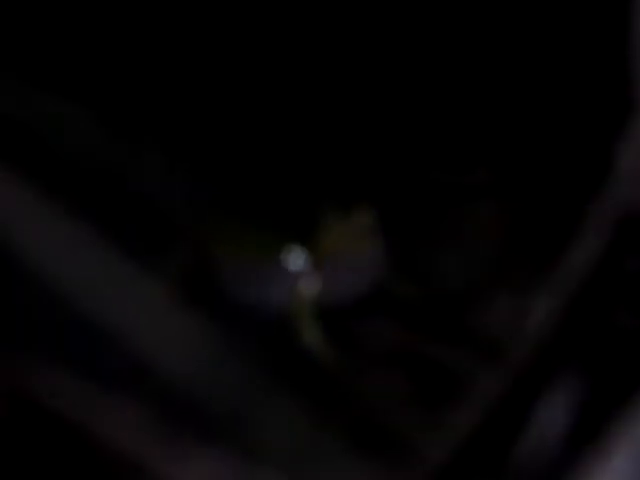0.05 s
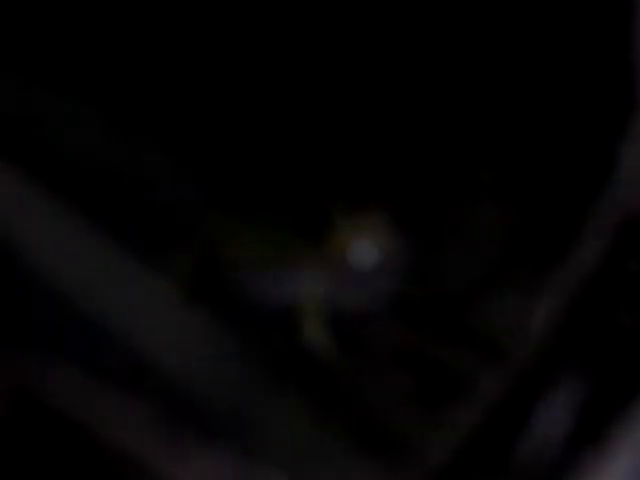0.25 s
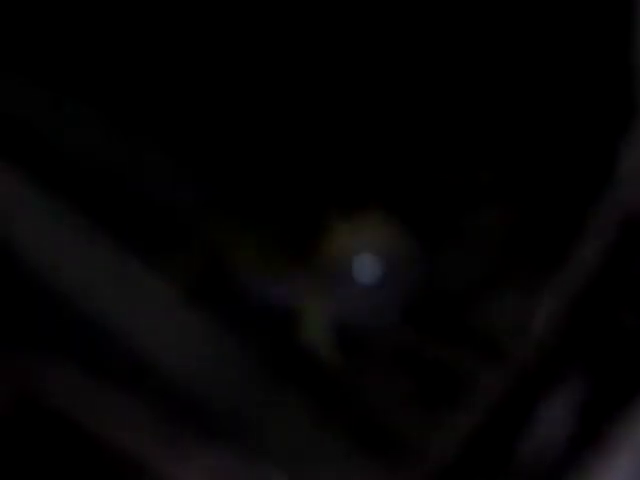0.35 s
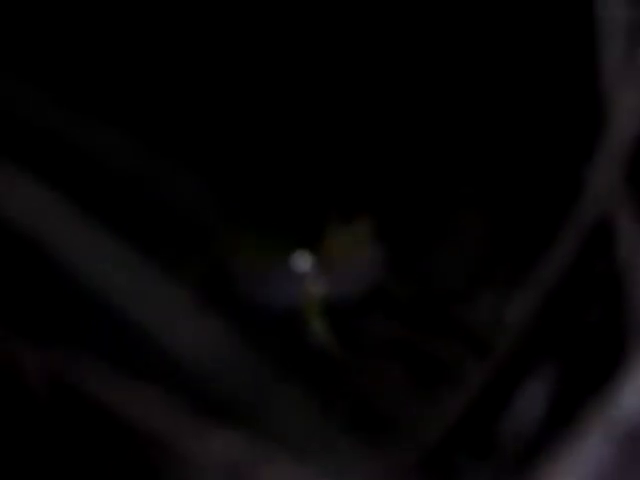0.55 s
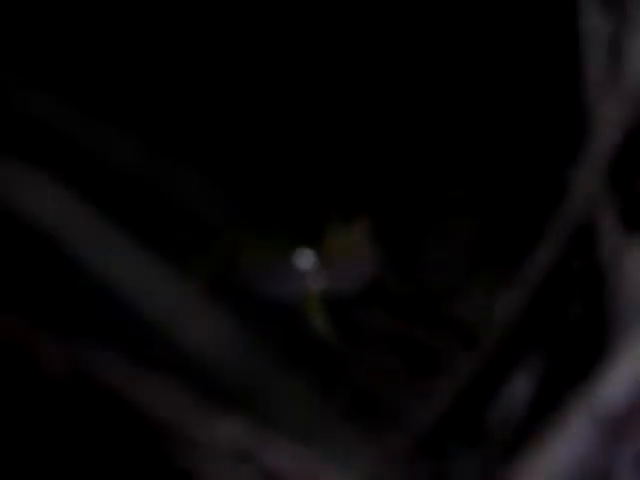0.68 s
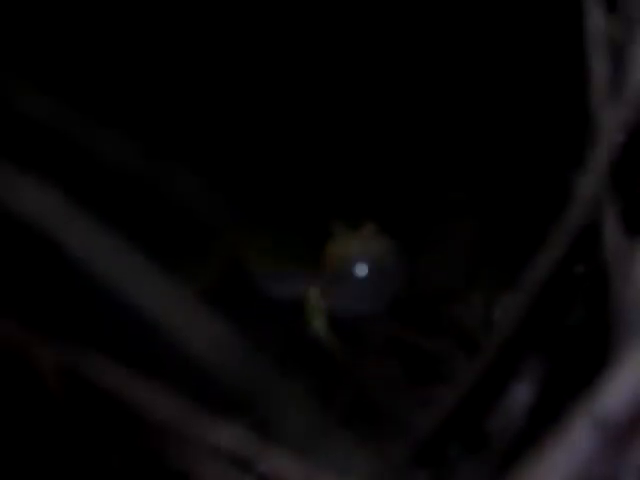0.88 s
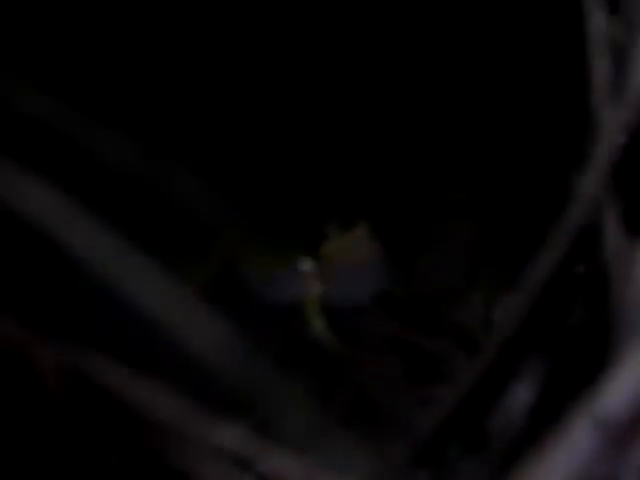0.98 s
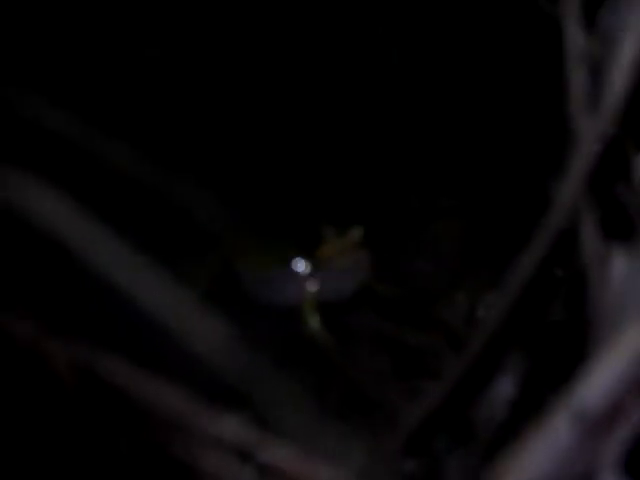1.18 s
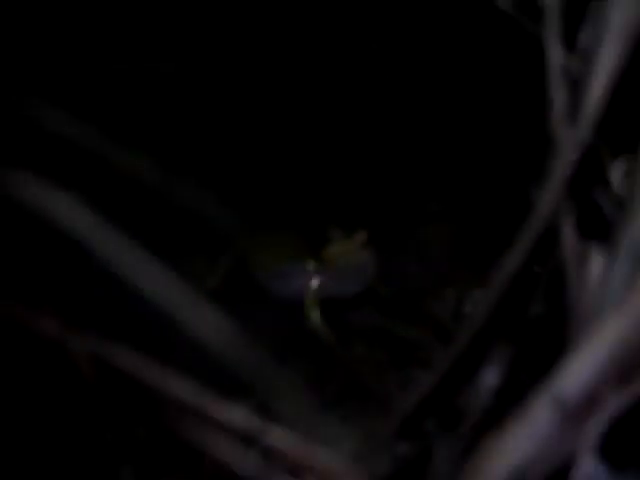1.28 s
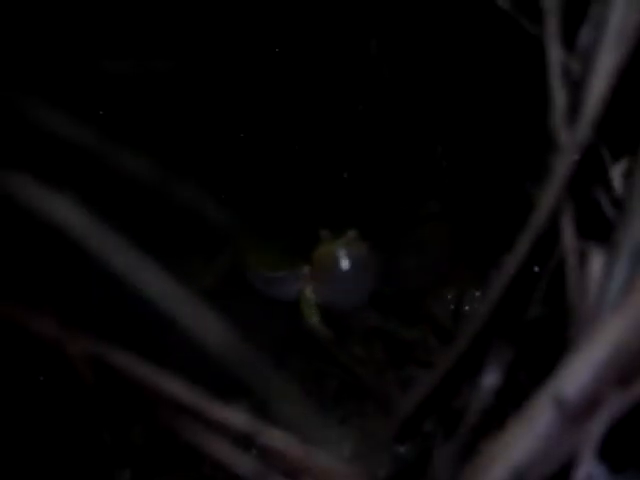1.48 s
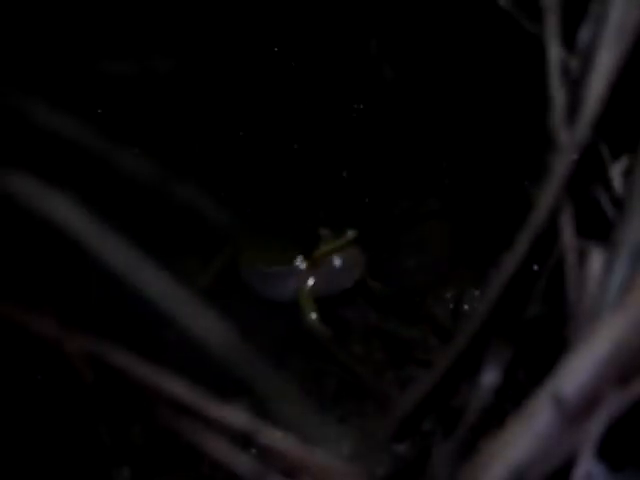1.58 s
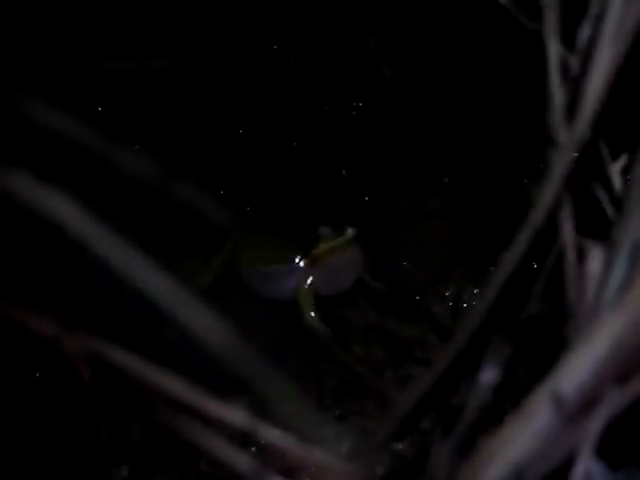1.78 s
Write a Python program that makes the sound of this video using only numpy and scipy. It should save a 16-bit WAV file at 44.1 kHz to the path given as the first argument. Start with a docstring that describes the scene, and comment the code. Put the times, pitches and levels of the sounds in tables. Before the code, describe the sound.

A small tree frog close by gives short harsh rasping croaks at night over faint crickets

```python
"""Night brush, with a tree frog croaking close by. Each croak is a train of about 120 pulses a second: the
larynx opens with a soft push and a rasp of air, then snaps shut and rings the vocal sac, whose pitch rises
as it fills; late in a croak every other snap fails. Behind it are far frogs (noise-smeared pulse trains over
a steady chorus band), three trilling cricket voices (short falling tones), soft taps in the brush (fading
noise bands) and faint night air (coloured noise)."""
import sys
import numpy as np
from scipy import signal
from scipy.fft import rfft, irfft
from scipy.io import wavfile
from scipy.ndimage import uniform_filter1d

SR = 44100
rng = np.random.default_rng(int(sys.argv[2]) if len(sys.argv) > 2 else 0)


def materialize(psi):
    """Save the field psi as 16-bit PCM at rate SR to the path in sys.argv[1].

    A 1-D psi becomes a single channel; in a 2-D psi each row is a channel.
    """
    bounded = np.clip(np.atleast_2d(psi).T, -1, 1)
    quanta = np.round(bounded * 32767).astype(np.int16)
    wavfile.write(sys.argv[1], SR, quanta)


N = 81585  # scene length, samples


def undb(db):
    """Turn dB into an amplitude factor."""
    return 10 ** (np.asarray(db) / 20)


def unit(x):
    """Scale to rms 1."""
    return x / np.sqrt(np.mean(x ** 2))


def colour(x, points):
    """Causal minimum-phase filter through (f/Hz, level/dB) points, joined on a log-frequency axis."""
    hz, db = np.array(points, float).T
    size = 2048
    f = np.maximum(np.fft.rfftfreq(size, 1 / SR), 1)
    gain = undb(np.interp(np.log(f), np.log(hz), db))
    # Folding the cepstrum onto positive time makes the filter minimum-phase
    cepstrum = irfft(np.log(gain))
    cepstrum[1:size // 2] *= 2
    cepstrum[size // 2 + 1:] = 0
    impulse = irfft(np.exp(rfft(cepstrum)))
    return signal.fftconvolve(x, impulse)[:len(x)]


def band(hz, width_hz):
    """Noise in one bell-shaped band, rms 1."""
    f = np.fft.rfftfreq(N, 1 / SR)
    bell = np.exp(-((f - hz) / width_hz) ** 2)
    return unit(irfft(rfft(rng.standard_normal(N)) * bell, N))


def walk(rate):
    """Smooth random drift, rms 1, with `rate` new values a second."""
    k = int(SR / rate)
    steps = np.repeat(rng.standard_normal(N // k + 1), k)
    return unit(uniform_filter1d(steps, k)[:N])


def add(out, at_s, sound):
    """Mix a short sound in at a time."""
    i = max(int(at_s * SR), 0)
    part = sound[:max(N - i, 0)]
    out[i:i + len(part)] += part


# Spectral tilt of the night air: f/Hz, relative level/dB
AIR_COLOUR = [(25, 14.5), (60, -5.5), (130, -4.5), (250, -5.5), (500, -5.5), (1000, -4.5), (2000, -3.5),
              (4600, -5), (5400, -9.5), (6900, -15), (7400, -9.5), (10000, -9)]
AIR_DB = -55.5


def night_air():
    """Faint broadband air: steady coloured noise."""
    return undb(AIR_DB) * unit(colour(rng.standard_normal(N), AIR_COLOUR))


# Far croaks: middle t/s, length t/s, level/dB
FAR_CALLS = [(0.097, 0.17, -54), (0.194, 0.047, -48.5), (.67, .19, -54.5), (1.033, 0.42, -57.5),
             (1.674, .2, -57.5)]
# Tone of the far croaks: f/Hz, relative level/dB
FAR_COLOUR = [(500, -37), (1050, -4), (1400, 2), (1800, -4), (2300, -4), (3100, 5.5), (3600, -10),
              (4500, -18.5), (9000, -32)]
# Tone of the chorus of still farther frogs: f/Hz, relative level/dB
CHORUS_COLOUR = [(2000, -36.5), (2400, -6.5), (2520, -1.5), (2730, 5.5), (2850, -11), (3080, 12), (3400, 4),
                 (3700, -2), (4200, -31.5)]
CHORUS_DB = -54.5
FAR_RATE_HZ, FAR_T60_S = 118, .12  # pulse rate; time for the trees' tail to fall 60 dB


def far_frogs(t):
    """Pulsed croaks smeared by the trees, over a steady chorus."""
    phase = np.cumsum(FAR_RATE_HZ * (1 + 0.034 * walk(30))) / SR
    pulses = np.diff(np.floor(phase), prepend=0)  # one click a cycle
    trees = rng.standard_normal(N) * undb(-60 * t / FAR_T60_S)
    voice = unit(colour(signal.fftconvolve(pulses, trees)[:N], FAR_COLOUR))
    swell = 0
    for middle, length, db in FAR_CALLS:
        swell = swell + undb(db) * np.exp(-(2 * (t - middle) / length) ** 4)
    chorus = unit(colour(rng.standard_normal(N), CHORUS_COLOUR))
    chorus_level = undb(CHORUS_DB + 0.88 * walk(6.65))
    return voice * swell + chorus_level * chorus


# Cricket voices: pitch f/Hz, fall in a pulse [share of pitch], pulse rate f/Hz, tone level/dB,
# level change by the end/dB, smear width f/Hz, smear level relative to the tone/dB
CRICKETS = [(3807, 0.067, 34, -48.5, -7.5, 215, -2), (6427, 0.016, 23, -55.5, -6.5, 660, -3.5),
            (6204, 0.018, 54, -66.5, 1.5, 440, 0)]
CRICKET_WAVER_DB, CRICKET_DRIFT = .7, .03  # rms level drift; rms pulse-rate drift as a share


def crickets(t):
    """Each wing stroke is a short falling tone; scattering in the foliage fills the gaps."""
    out = 0
    for hz, fall, rate, db, change_db, width_hz, smear_db in CRICKETS:
        stroke = np.cumsum(rate * (1 + CRICKET_DRIFT * walk(6.6))) / SR % 1
        pitch = hz * (1 + fall * (.5 - stroke) + 0.00412 * walk(90))
        carrier = np.sin(2 * np.pi * np.cumsum(pitch) / SR)
        tone = unit(np.sin(np.pi * stroke) ** 2 * carrier)
        smear = undb(smear_db) * band(hz, width_hz)
        level = undb(db + change_db * t / t[-1] + CRICKET_WAVER_DB * walk(13.26))
        out = out + level * (tone + smear)
    return out


# Soft taps in the brush: t/s, level/dB, ring f/Hz, decay t/s
TAPS = [(.03, -58.5, 850, 0.026), (.175, -56.5, 550, 0.066), (.62, -60.5, 400, .04),
        (0.444, -51, 720, 0.0066), (.46, -61, 375, 0.048), (1.148, -47, 826, 0.0066),
        (1.154, -61, 510, 0.09)]


def taps(t):
    """Dull, quickly fading knocks, each a noise band around its ring pitch."""
    out = 0
    for at, db, hz, decay in TAPS:
        fade = (t > at) * np.exp(-np.abs(t - at) / decay)
        out = out + undb(db) * fade * band(hz, hz / 2)
    return out


WOBBLE = .013  # random pitch spread of each ring, share


def ring(rings, t, progress, sac, chance):
    """One push on the throat and sac: each resonance swells and dies; those above 2.5 kHz follow the tension."""
    t, out = np.maximum(t, 0), 0
    for (hz, db, change_db, rise, decay), luck in zip(rings, chance):
        tension = sac if hz > 2500 else 1
        pitch = hz * tension * (1 + WOBBLE * luck)
        level = undb(db + change_db * progress)
        envelope = (1 - np.exp(-t / rise)) * np.exp(-t / decay)
        out = out + level * envelope * np.sin(2 * np.pi * pitch * t)
    return out


LIMITER_KNEE_DB = -5  # where levelling sets in, relative to the pulse's largest envelope


def limit(pulse):
    """A limiter levels off the loud part of each pulse, and its peak is set to 1."""
    envelope = uniform_filter1d(np.abs(signal.hilbert(pulse)), size=36)
    held = pulse / np.hypot(envelope, undb(LIMITER_KNEE_DB) * envelope.max())
    return held / np.abs(held).max()


TWIGS_DB, TWIGS_T60_S = -18, .028  # tail level; time for its exponential part to fall 60 dB


def twigs(x):
    """Nearby twigs and leaves scatter a very short tail."""
    t = np.arange(SR // 20) / SR
    tail = rng.standard_normal(len(t)) * undb(-60 * t / TWIGS_T60_S) * t
    scatter = signal.fftconvolve(x, tail / np.linalg.norm(tail))[:N]
    return x + undb(TWIGS_DB) * scatter


# Near croaks: start t/s, length t/s, relative level/dB, time into the croak when snaps begin to fail t/s
CROAKS = [(0.2217, 0.15, 0.5, .072), (0.7695, 0.16, 0, .055), (1.2944, .153, -.5, .079),
          (1.8435, 0.25, -5, .08)]
# Rings as the larynx opens: f/Hz, relative level/dB, change over the croak/dB, rise t/s, decay t/s
OPEN_RINGS = [(1233, -2, -6.5, 0.0014, 0.0015), (1815, -18.5, -3, 0.0006, 0.0019),
              (2230, -4.5, -5.5, 0.00038, .0012), (2993, -6, 4.5, 0.00089, 0.0018)]
# Rings as it snaps shut: f/Hz, relative level/dB, change over the croak/dB, rise t/s, decay t/s
SNAP_RINGS = [(3003, 1, 9.5, 0.00045, 0.001), (3640, -31, -3, .0002, 0.0028),
              (4150, -25.5, 4.5, 0.000033, 0.0012), (5970, -28, -14.5, .0001, 0.00094)]
# Tone of the sharp click of the snap: f/Hz, relative level/dB
CLICK_COLOUR = [(30, 9.5), (70, 5), (170, -6.5), (700, -2), (1500, 5), (4000, -24), (5200, -28.5),
                (6700, -17), (7600, -9.5), (10000, -18)]
# Tone of the rasp of air through the open larynx: f/Hz, relative level/dB
RASP_COLOUR = [(100, -37), (750, -6), (1200, 7.5), (3000, 13.5), (4000, -7), (4700, 3), (6600, 3),
               (7400, -18.5), (10000, -43.5)]
PERIOD_S, START_LAG_S, SETTLE_S = .0078, 0.0012, .038  # pulses start slower and settle
END_LAG_S, END_S = .0016, .018  # and slow down as the air runs out
JITTER_S, SNAP_S, SNAP_SCATTER_S = .0002, .0019, .0002  # opening jitter; delay from opening to snap, its spread
SHIMMER_DB, CLICK_SHIMMER_DB = .7, 2.5  # random spread of pulse and click levels
FIRST_DB, ATTACK_S, LAST_DB, RELEASE_S = -14, .022, -2, 0.032  # quieter edges of a croak
SAC_FLAT, FILL_S = .1, .033  # the sac rings flat by this share until it fills
FAILED_SNAP_DB, FAILED_PULSE_DB = -15, -2
SNAP_CLICK_DB, HARDEST, CLICK_EDGE_DB = 3, 0.52, -23  # click is hardest this share through the croak
RASP_DB, RASP_FADE_DB, RASP_S = -13, -22.5, 0.0012  # level, change over the croak, time to peak
FROG_DB = -5.5
BODY_HZ = 1053  # the small body radiates little below this


def frog():
    """Pulse after pulse: an opening push with a rasp of air, then a closing snap; effort sets the height."""
    rings, clicks, rasp = np.zeros((3, N))
    t = np.arange(SR // 70) / SR
    for start, length, db, fails_after in CROAKS:
        age, failed = 0, False
        for chance in rng.standard_normal(size=(30, 12)):
            if age >= length:
                break
            jitter, scatter, shimmer, force = chance[:4]
            progress = age / length
            sac = 1 - SAC_FLAT * np.exp(-age / FILL_S)
            failed = age > fails_after and not failed  # every other snap fails

            attack_db = FIRST_DB * max(1 - age / ATTACK_S, 0) ** 2
            release_db = LAST_DB * max(1 - (length - age) / RELEASE_S, 0)
            swell_db = attack_db + release_db
            effort = undb(db + swell_db + FAILED_PULSE_DB * failed + SHIMMER_DB * shimmer)
            snap = undb(FAILED_SNAP_DB * failed)
            snap_s = SNAP_S + SNAP_SCATTER_S * scatter
            opens = start + age + JITTER_S * jitter

            push = ring(OPEN_RINGS, t, progress, sac, chance[4:8])
            shut = ring(SNAP_RINGS, t - snap_s, progress, sac, chance[8:])
            add(rings, opens, effort * limit(push + snap * shut))

            # A failed snap weakens the rasp and click too
            puff = t / RASP_S * np.exp(1 - t / RASP_S)
            add(rasp, opens, effort * snap * undb(RASP_DB + RASP_FADE_DB * progress) * puff)
            edge_db = CLICK_EDGE_DB * (2 * (progress - HARDEST)) ** 2
            click_db = SNAP_CLICK_DB + edge_db + CLICK_SHIMMER_DB * force
            add(clicks, opens + snap_s, np.array([effort * snap * undb(click_db)]))

            start_lag = START_LAG_S * np.exp(-age / SETTLE_S)
            end_lag = END_LAG_S * np.exp((age - length) / END_S)
            age += PERIOD_S + start_lag + end_lag
    body = signal.butter(8, BODY_HZ, "high", fs=SR, output="sos")
    breath = colour(rasp * rng.standard_normal(N), RASP_COLOUR)
    voice = signal.sosfilt(body, rings) + breath
    return undb(FROG_DB) * (twigs(voice) - colour(clicks, CLICK_COLOUR))


def scene():
    """The near frog over the night around it."""
    t = np.arange(N) / SR
    return (night_air() + far_frogs(t) + crickets(t) + taps(t) + frog())[None]


def record(dry):
    """A steep elliptic low-pass cuts the treble above 9950 Hz."""
    low_pass = signal.ellip(10, .2, 70, 9950, fs=SR, output="sos")  # 0.2 dB ripple, 70 dB stopband
    return signal.sosfilt(low_pass, dry)


dry = scene()
out = record(dry)
materialize(out)
```